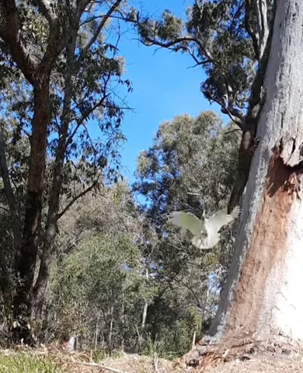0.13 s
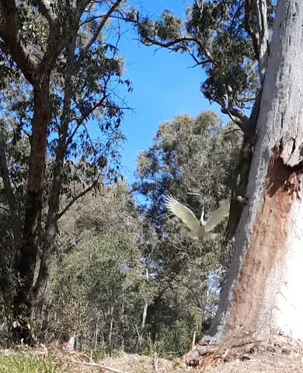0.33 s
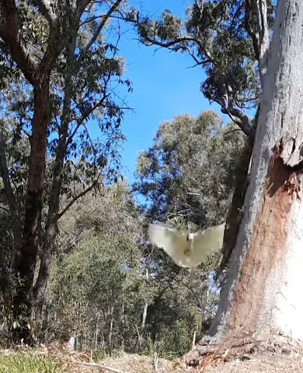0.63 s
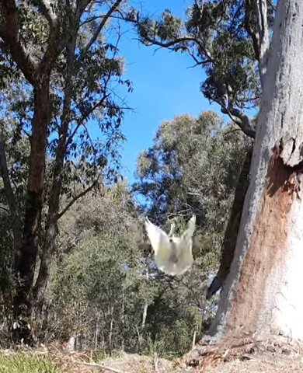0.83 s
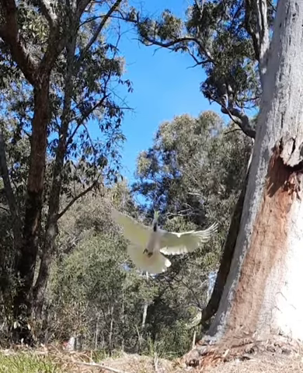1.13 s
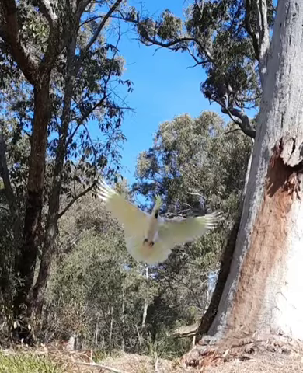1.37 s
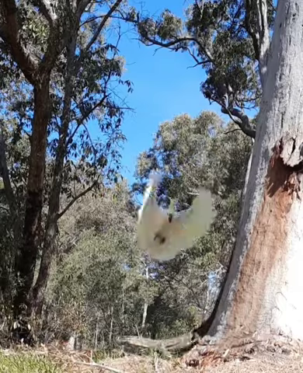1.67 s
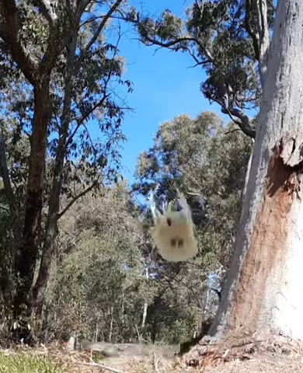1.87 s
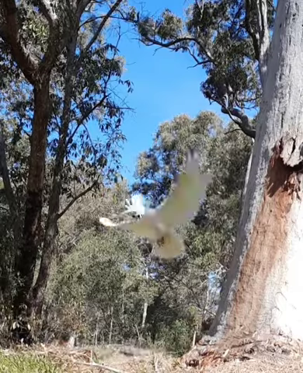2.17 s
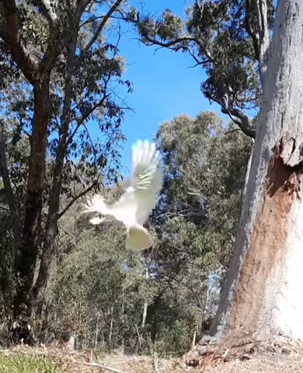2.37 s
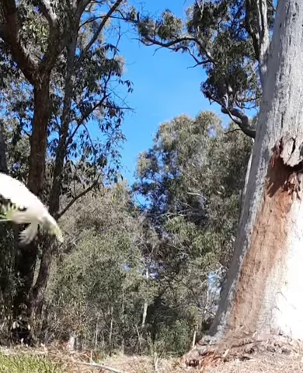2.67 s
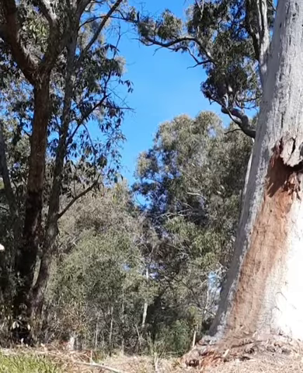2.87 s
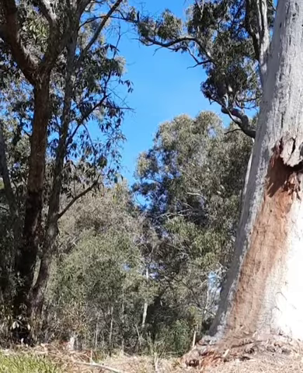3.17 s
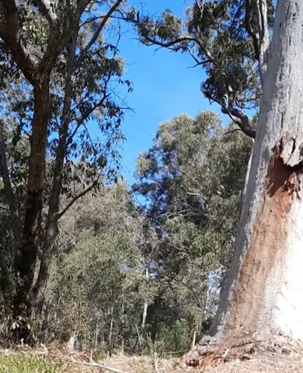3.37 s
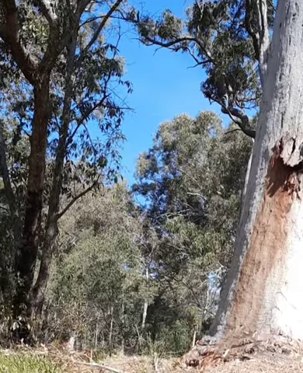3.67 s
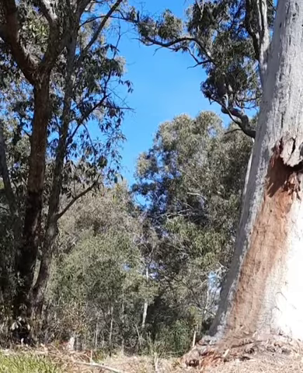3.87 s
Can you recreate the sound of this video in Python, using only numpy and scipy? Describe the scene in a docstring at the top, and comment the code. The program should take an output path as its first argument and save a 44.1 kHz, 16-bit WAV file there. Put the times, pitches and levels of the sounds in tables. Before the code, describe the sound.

A cockatoo screeches six times close to the microphone, harsh and rasping, with faint wing puffs and feather swishes. The last call dulls as it turns away, while the woodland echoes softly over a faint hiss of trees.

```python
"""A cockatoo in mid-screech, hovering close to the microphone in woodland: six screeches in all.
Each is a train of sharp voice pulses, mostly chaotic and briefly regular, ringing in throat and beak.
Wings puff and feathers swish; the bird turns to fly off, and its direct sound dulls while the trees
keep answering. A faint, far drone and the hiss of the trees lie underneath."""
import sys
import numpy as np
from scipy import signal
from scipy.fft import rfft, irfft, next_fast_len
from scipy.io import wavfile
from scipy.ndimage import uniform_filter1d, map_coordinates

SR = 44100
rng = np.random.default_rng(int(sys.argv[2]) if len(sys.argv) > 2 else 0)


def materialize(psi):
    """Save the field psi as 16-bit PCM at rate SR to the path in sys.argv[1].

    A 1-D psi becomes a single channel; in a 2-D psi each row is a channel.
    """
    bounded = np.clip(np.atleast_2d(psi).T, -1, 1)
    quanta = np.round(bounded * 32767).astype(np.int16)
    wavfile.write(sys.argv[1], SR, quanta)


N = 176400


def cockatoo():
    """The syrinx drives throat and beak; twice the rough voice locks into a clear nasal tone."""
    # course of the voice (time [s], pitch before bending [Hz], roughness [0-1])
    contour = [(.08, 223.5, 0.62), (.33, 225.4, 0.95), (.44, 229.1, 0.52), (.53, 232.9, 0.94),
               (.62, 223.2, 0.49), (.7, 240.5, 0.51), (.78, 237.9, 0.62), (.83, 222.8, 0.51),
               (.905, 224.6, .45), (1.12, 235.9, 0.83), (1.25, 236.6, .5), (1.3, 220.3, 0.34),
               (1.38, 233.9, 0.88), (1.46, 226.6, 0.38), (1.72, 231.5, 0.7), (1.91, 243.7, 0.79),
               (2.04, 218.8, 0.66), (2.13, 241, .9), (2.23, 220.7, 0.72), (2.55, 229.1, 0.88),
               (2.87, 214.6, 0.76), (3.55, 222.7, 0.82)]
    # spells of clear tone (start [s], end [s])
    clear_spells = [(-.1, .068), (.826, .888)]
    clear_hz, edge_s = 218.8, .005
    t = np.arange(N) / SR
    pitch, rough = curves(contour, t)
    loud, bend, closed, calm = gestures(t)
    clear = sum(np.tanh((t - a) / edge_s) - np.tanh((t - b) / edge_s) for a, b in clear_spells) / 2
    pitch = pitch * bend * (1 - clear) + clear_hz * clear
    rough = np.clip(rough * (1 - calm) * (1 - clear), .04, 1)
    source = loud * spitting(steady_breath(syrinx(pitch, rough)), rough)
    waver = .25 * rough * wobble(18)
    voice = throat_and_beak(source, np.clip(closed * (1 - clear) + waver, -.5, 1))
    return voice + nasal_ring(voice * clear)


def gestures(t):
    """The beak opens and pitch climbs into a screech; at its end the voice sags and calms, the beak shuts."""
    # screeches (start [s], end [s], level the swell ends on [dB], swell [dB], attack [s])
    screeches = [(-.3, 0.173, -16, 8.5, .06), (0.317, 0.937, -18, -2, 0.093),
                 (1.058, 1.534, -16, -1.5, 0.056), (1.694, 2.292, -16, -2.5, 0.057),
                 (2.453, 3.01, -20, -4.5, 0.052), (3.193, 3.689, -18, 5, 0.062)]
    # pushes of the voice (time [s], boost [dB], half width [s])
    surges = [(2.255, 2, .016), (2.58, 2, .02), (2.762, 4, .008), (2.962, 1.5, .012)]
    release_s, climb_s, sag_s, open_s, close_s = .037, .04, .03, .015, .065
    loud, bend, closed, calm = np.zeros(N), np.ones(N), np.ones(N), np.zeros(N)
    for start, end, db, swell_db, attack_s in screeches:
        on = (t > start) & (t < end)
        since, left = t[on] - start, end - t[on]
        shape = np.minimum(since / attack_s, 1) ** .63 * np.minimum(left / release_s, 1) ** 1.31
        loud[on] = shape * amp(db + swell_db * (since / (end - start) - 1))
        bend[on] = (1 - .45 * np.exp(-(since / climb_s) ** 2)) * (1 - .3 * np.exp(-left / sag_s))
        closed[on] = np.maximum(np.exp(-since / open_s), np.exp(-left / close_s))
        calm[on] = .826 * np.exp(-(left / (2 * sag_s)) ** 2)
    surge_db = sum(db * np.exp(-((t - s) / width) ** 2) for s, db, width in surges)
    flutter_db = .69 * wobble(24.47)
    return loud * amp(surge_db + flutter_db), bend, closed, calm


def syrinx(pitch, rough, wander=.035, jitter_cycles=.1188, rasp_cycles=.94):
    """One pulse a cycle, each with a puff of air noise; roughness scatters them and slips strays between."""
    samples = np.arange(N)
    cycles = np.cumsum(pitch * (1 + wander * rough * wobble(60))) / SR
    k = np.arange(1, int(cycles[-1]))
    shift, _, stray_size, stray_shift = rng.standard_normal((N // 100, 4))[:len(k)].T
    pulse_rough = np.interp(k, cycles, rough)
    at = np.sort(np.interp(k + jitter_cycles * pulse_rough * shift, cycles, samples))
    stray_at = np.interp(k + .5 + stray_shift / 6, cycles, samples)
    train = pulses(at, np.ones(len(k))) + pulses(stray_at, pulse_rough * stray_size)
    latest = at[np.maximum(np.searchsorted(at, samples) - 1, 0)]
    gate = unit(np.exp(-np.abs(samples - latest) * pitch / SR / rasp_cycles))
    rasp = .12 + .88 * rough
    flow = train * np.sqrt(SR / pitch.mean()) + rasp * gate * rng.standard_normal(N)
    return flow / np.sqrt(1 + rasp ** 2 + rough ** 2)


def steady_breath(flow, window_s=.015):
    """The breath holds the power steady, near 1."""
    size = int(window_s * SR)
    power = uniform_filter1d(uniform_filter1d(flow ** 2, size), size)
    return flow / np.sqrt(np.abs(power) + 1e-12)


def spitting(source, rough, corner_hz=5440):
    """Harder and softer pulses differ most in the treble, so a rough voice spits unevenly."""
    treble = filtered(source, lambda hz: 1 - 1 / (1 + (hz / corner_hz) ** 2) ** 2)
    spit_db = rough * (4 * wobble(260) + 2 * wobble(45))
    return source + treble * (unit(amp(spit_db)) - 1)


def throat_and_beak(source, closed, steps=4):
    """The resonances sink and darken as the beak closes, fading between a few beak positions."""
    # resonances with the beak open (frequency [Hz], relative level [dB])
    throat = [(120, -80.5), (230, -44), (330, -28), (440, -24.5), (600, -24), (780, -23.5), (980, -14),
              (1220, -19), (1500, -16), (1780, -12.5), (1950, -1.5), (2090, 2.5), (2250, -0.5), (2500, -5),
              (2840, 2.5), (3050, -5.5), (3300, -7.5), (3780, -3.5), (4400, -10.5), (5300, -9.5),
              (6500, -18.5), (7600, -24), (9000, -23), (12000, -24), (14000, -24.5), (15800, -37.5)]
    voice = np.zeros(N)
    for closure in np.arange(-steps // 2, steps + 1) / steps:
        weight = np.maximum(1 - steps * np.abs(closed - closure), 0)
        response = ring(throat, scale=1 - .11 * closure, db_per_octave=-3.5 * max(closure, 0) ** 2)
        voice += signal.fftconvolve(source * weight, response)[:N]
    return voice


def nasal_ring(voice):
    """A steady tone builds up narrow resonances."""
    # nasal resonances (frequency [Hz], width [Hz], gain [dB])
    modes = [(1980, 54, 0.5), (2844, 57, 2.5)]
    return filtered(voice, lambda f: sum(amp(db) * 1j * f * width / (hz * hz - f * f + 1j * f * width)
                                         for hz, width, db in modes))


def hollow_tones():
    """A second, hollow voice tone wavers, swells and fades on the lowest throat resonance."""
    # tones (start [s], end [s], first pitch [Hz], last pitch [Hz], level [dB], waver [share of pitch])
    tones = [(0.701, 0.828, 1019, 964, -31, 0.013), (3.273, 3.681, 978.6, 962.5, -40.5, .05)]
    t, out = np.arange(N) / SR, np.zeros(N)
    for start, end, first_hz, last_hz, db, waver in tones:
        progress = np.clip((t - start) / (end - start), 0, 1)
        hz = (first_hz + (last_hz - first_hz) * progress) * (1 + waver * wobble(200))
        swell = amp(db + 1.7 * wobble(70)) * np.sqrt(np.abs(np.sin(np.pi * progress)))
        out += swell * np.sin(2 * np.pi * np.cumsum(hz) / SR)
    return out


def beamed(voice, loss_share):
    """The beak beams treble forward: the voice dulls as the bird turns off mic and drifts sideways."""
    # the bird's turn (time [s], loss at 2 kHz before loss_share [dB], left channel's lead [ms])
    flight = [(0, -0.15, -0.011), (.6, -0.5, -0.02), (1.3, 0.5, -0.0044), (1.9, 1.44, 0.0061),
              (2.1, 1.9, 0.0057), (2.3, 3.5, 0.014), (2.57, 4, 0.012), (2.68, 4.5, 0.016),
              (2.95, 3.5, 0.0052), (3.25, 18, 0.011), (3.45, 13.5, 0.01), (3.6, 15, .008)]
    # directivity of the beak (frequency [Hz], multiple of that loss [ratio])
    beam = [(400, 0.3), (700, -0.22), (1000, 0.09), (1400, 0.22), (2000, 1), (2900, 0.7), (4000, 1.3),
            (7000, 1.97), (10000, 4.5), (15000, 6)]
    hz, t, spectra = signal.stft(voice, SR, nperseg=256)
    loss_db, lead_ms = curves(flight, t)
    spectra = spectra * amp(-loss_share * along(beam, hz)[:, None] * loss_db)
    lead = np.exp(1j * np.pi * hz[:, None] * lead_ms / 1000)
    return signal.istft(np.array([spectra * lead, spectra / lead]), SR, nperseg=256)[1][:, :N]


def wings():
    """Close to the microphone: low puffs of air from the wings, a dry snap, feathers swishing past."""
    # moments of each sound (time [s], level [dB])
    wingbeats = [(.965, -49), (1.08, -51)]
    snaps = [(2.765, -32)]
    rustles = [(2.93, -50), (3.25, -50)]
    # their spectra (frequency [Hz], relative level [dB])
    puff = [(25, -21), (80, 8), (130, -12), (300, -25), (1000, -80)]
    snap = [(500, -40), (3000, -12), (11000, 3), (15000, -10)]
    feathers = [(2000, -22), (5000, 5.5), (6700, 2.5), (8500, -11), (10500, 0), (12500, -8), (15000, -14)]
    return (bursts(wingbeats, puff, half_width_s=.023) + bursts(snaps, snap, half_width_s=.0023)
            + bursts(rustles, feathers, half_width_s=.22))


def woods(voice, trunks=10, trunks_db=-10.5, latest_s=.02, tail_db=-17.5):
    """Near trunks send back weak copies; the farther trees a soft tail."""
    # decay among the trees (frequency [Hz], time to fall 60 dB [s])
    decay = [(200, 0.24), (1000, 0.47), (2200, 0.75), (5000, 0.75), (12000, 0.43)]
    # colour of the echoes (frequency [Hz], gain [dB])
    colour = [(300, -1), (1000, 3.5), (2100, -4.5), (3500, -5.5), (7000, -1.5), (14000, 1)]
    hz, t, spectra = signal.stft(rng.standard_normal((2, SR)), SR, nperseg=256)
    tail = signal.istft(spectra * amp(-60 * t / along(decay, hz)[:, None]), SR, nperseg=256)[1]
    response = amp(tail_db) * tail / np.linalg.norm(tail[0])
    for part in response:
        delays = (SR * latest_s * rng.uniform(.1, 1, trunks)).astype(int)
        part[delays] += amp(trunks_db) * rng.standard_normal(trunks) / np.sqrt(trunks)
    mid, side = signal.fftconvolve(voice[None], response, axes=1)[:, :N]
    return filtered(spread(mid, side, width=.95), lambda hz: amp(along(colour, hz)))


def background(drone_db=-61, hiss_db=-58):
    """A far low drone near the centre, and the faint hiss of the trees all around."""
    # spectra of drone and hiss (frequency [Hz], relative level [dB])
    drone = [(20, -24), (45, -23), (62, -4.5), (77, 0.5), (92, -7.5), (135, -16), (158, -7), (185, -18),
             (400, -16), (900, -25.5), (3000, -70)]
    hiss = [(180, -37), (300, 2), (550, -41), (738, 2), (1420, -5), (2070, 2), (2280, 4), (3730, 0),
            (15000, -28)]
    return (amp(drone_db) * spread(noise(drone), noise(drone), width=.26)
            + amp(hiss_db) * spread(noise(hiss), noise(hiss), width=1))


def amp(db):
    return 10 ** (np.asarray(db) / 20)


def unit(x):
    return x / np.sqrt(np.mean(x ** 2) + 1e-20)


def along(points, hz):
    """(frequency [Hz], value) points read on a log axis."""
    freqs, values = np.transpose(points)
    return np.interp(np.log(hz + 1), np.log(freqs + 1), values)


def curves(rows, t):
    """Each column after the time, read at the times t."""
    times, *columns = np.transpose(rows)
    return [np.interp(t, times, column) for column in columns]


def wobble(rate):
    """A smooth random curve, rate knots a second."""
    return map_coordinates(rng.standard_normal(int(N * rate / SR) + 4), [np.arange(N) * rate / SR])


def filtered(x, response):
    """x through a complex response of frequency."""
    size = next_fast_len(N + SR // 2)
    return irfft(rfft(x, size) * response(np.fft.rfftfreq(size, 1 / SR)), size)[..., :N]


def noise(spectrum):
    """Coloured noise of rms 1."""
    return unit(filtered(rng.standard_normal(N), lambda hz: amp(along(spectrum, hz))))


def bursts(rows, spectrum, half_width_s):
    """Swells of coloured noise."""
    t = np.arange(N) / SR
    return noise(spectrum) * sum(amp(db) * np.exp(-((t - s) / half_width_s) ** 2) for s, db in rows)


def ring(spectrum, scale, db_per_octave, size=4096):
    """Minimum-phase impulse response of energy 1, its frequencies scaled and tilted."""
    hz = np.fft.rfftfreq(size, 1 / SR)
    cepstrum = irfft(np.log(amp(along(spectrum, hz / scale) + db_per_octave * np.log2(hz + 20))))
    cepstrum[1:size // 2] *= 2
    cepstrum[size // 2 + 1:] = 0
    response = irfft(np.exp(rfft(cepstrum)))
    return response / np.linalg.norm(response)


def pulses(at, sizes, order=8):
    """Sharp pulses at fractional sample positions."""
    index = np.floor(at).astype(int)[:, None] + np.arange(1 - order, order + 1)
    offset = index - at[:, None]
    taps = sizes[:, None] * np.sinc(offset) * np.cos(np.pi * offset / (2 * order)) ** 2
    return np.bincount(np.clip(index + 1, 0, N + 1).ravel(), taps.ravel(), N + 2)[1:-1]


def spread(mid, side, width):
    """Left and right from a shared and an opposed part."""
    return np.array([mid + width * side, mid - width * side]) / np.hypot(1, width)


def scene():
    """The bird close up and its echo from the trees, which dulls far less, over wings and background."""
    voice = cockatoo() + hollow_tones()
    direct = beamed(voice, loss_share=.75)
    echo = woods(beamed(voice, loss_share=.14)[0])
    return direct + echo + wings() + background()


def record(dry):
    """The two microphone ports differ in colour and phase; peaks are rounded, the band is limited."""
    # balance of the ports (frequency [Hz], left minus right [dB])
    balance = [(60, 0.5), (80, 0.5), (110, 0.0), (140, -1.0), (190, -4.5), (260, -6.0), (340, -3.0),
               (460, -0.5), (610, -0.5), (820, -2.5), (1100, -5.5), (1470, -4.0), (1960, -5.0),
               (2620, -1.0), (3510, 1.5), (4690, -0.5), (6270, -3.0), (8390, 7.5), (11200, 14.0),
               (15000, 14.0)]
    # phase between the ports (frequency [Hz], left's lead [rad])
    phase = [(0, 0), (950, 0.0), (1210, 0.7), (2410, 2.3), (2930, 2.5), (5680, 4.0), (6370, 5.3),
             (7150, 6.2), (8270, 6.6), (10100, 5.8), (11800, 7.1), (13400, 8.8), (14100, 8.3), (15400, 9.3)]
    ceiling, top_hz = .97, 15800

    def ports(hz):
        ratio, lead = amp(along(balance, hz)), np.exp(.5j * along(phase, hz))
        return np.array([ratio * lead, 1 / lead]) * np.sqrt(2 / (1 + ratio ** 2))
    picked_up = filtered(dry, ports)
    rounded = picked_up / (1 + (picked_up / ceiling) ** 6) ** (1 / 6)
    return filtered(rounded, lambda hz: hz < top_hz)


dry = scene()
out = record(dry)
materialize(out)
```